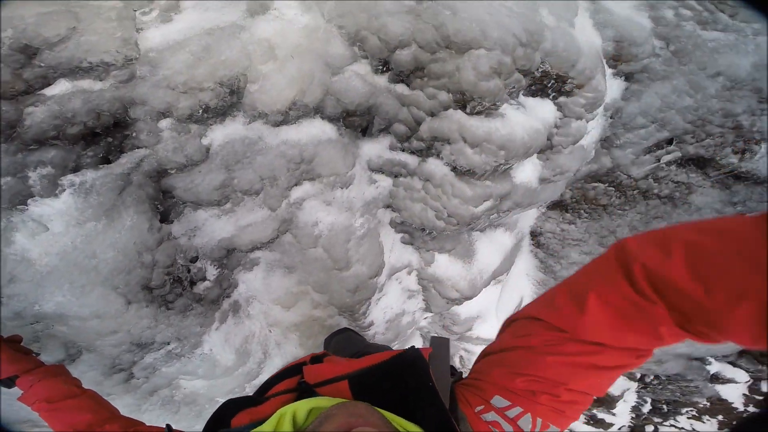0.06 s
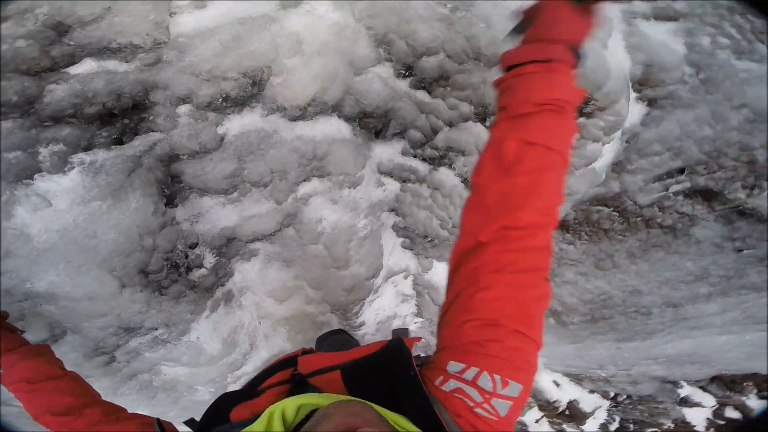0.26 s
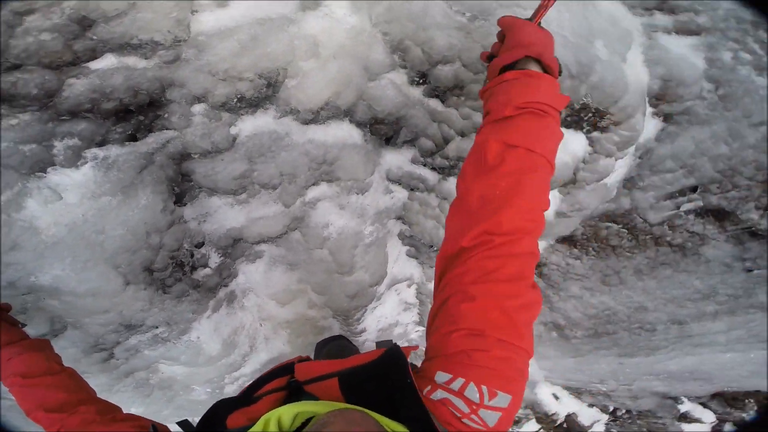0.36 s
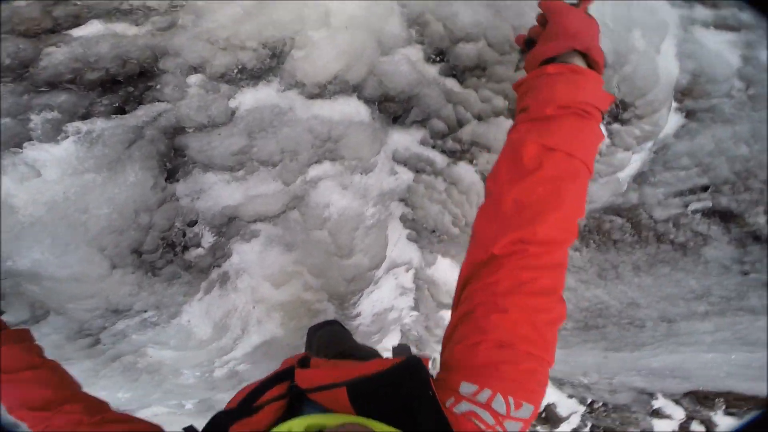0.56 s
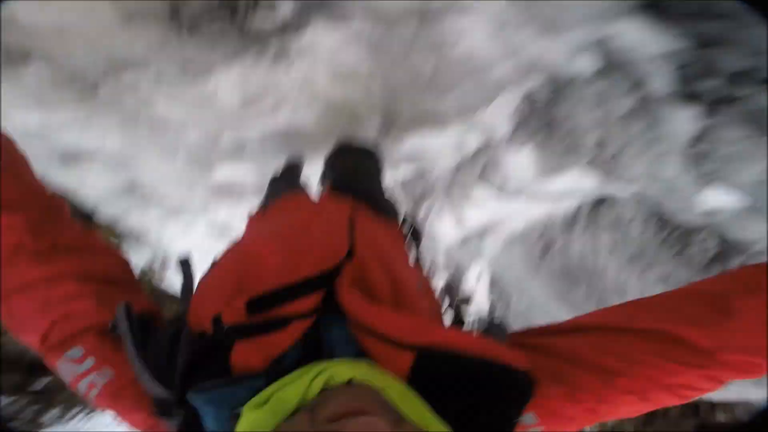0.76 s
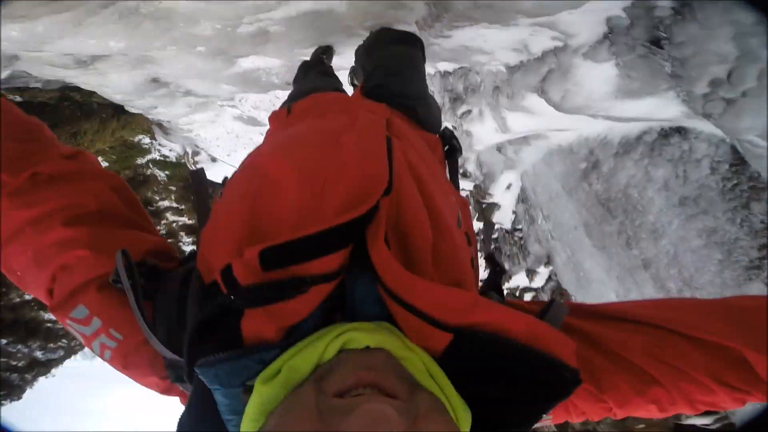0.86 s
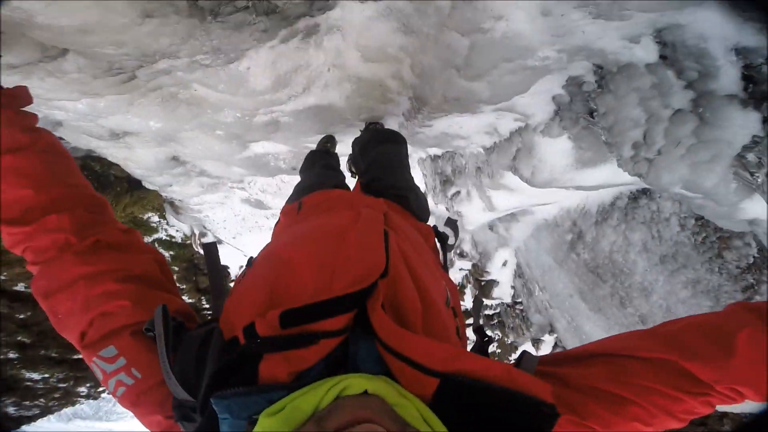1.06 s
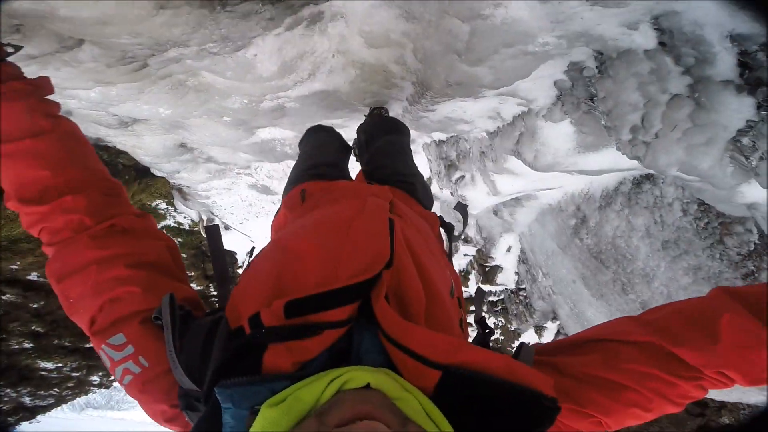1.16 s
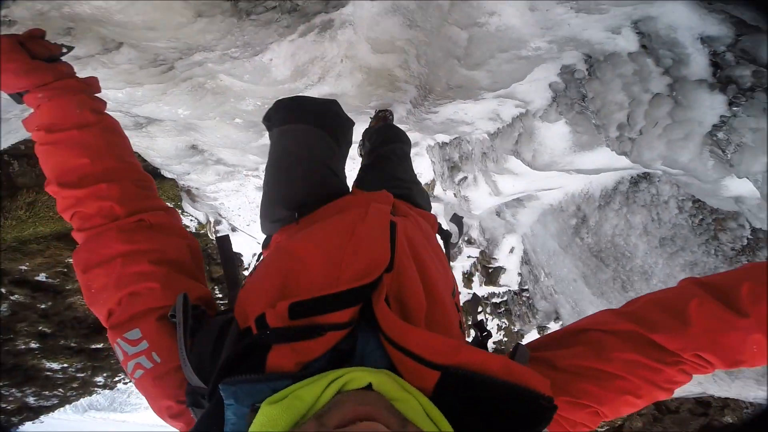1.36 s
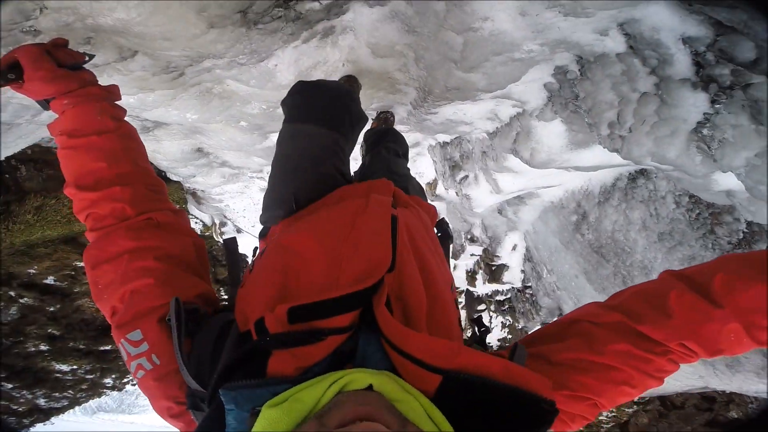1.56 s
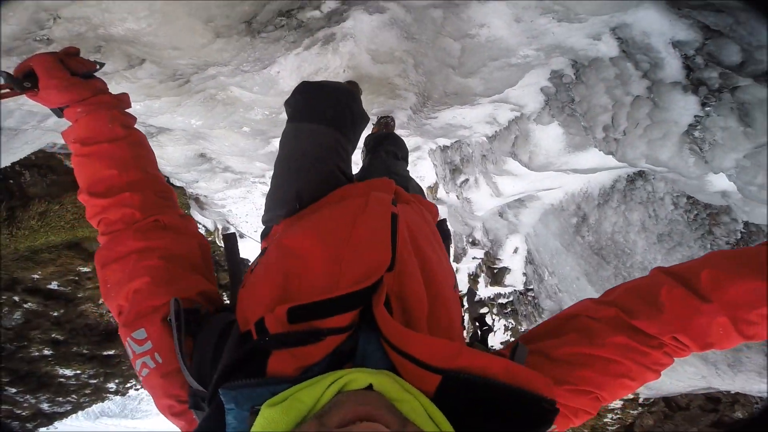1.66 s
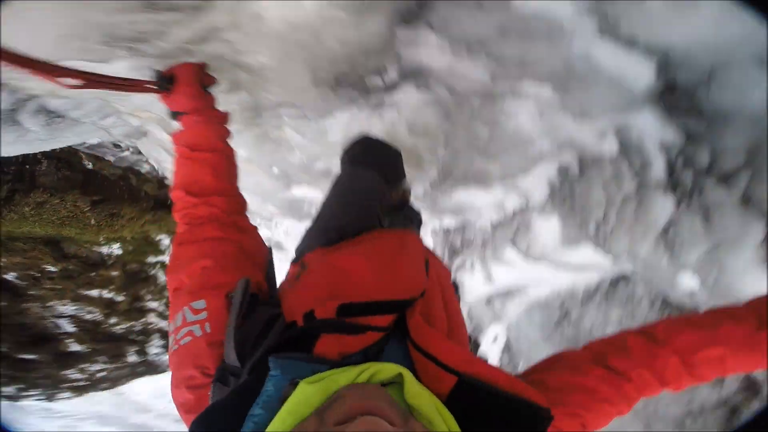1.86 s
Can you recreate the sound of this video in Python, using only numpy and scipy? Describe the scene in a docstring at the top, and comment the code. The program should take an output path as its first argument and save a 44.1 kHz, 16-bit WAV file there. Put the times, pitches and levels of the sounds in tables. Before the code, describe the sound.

Ice climbing up close: steel cracks into ice, hollow knocks and gear clatter, then a duller bite

```python
"""Climbing a frozen cascade

Steel points bite into the ice twice, the second time in two close strokes, with a thud, a crunch and a spray
of chips: damped modes over decaying grainy noise. Around them come hollow knocks, short pulses with an echo and
an after-ring, then a dry clack, clashing gear and scratchy clinks. Movement rumbles on the housing of the
helmet-worn camera, over a faint rush of water and ticking crumbs of ice: coloured noise and tiny damped tones."""
import sys
import numpy as np
from scipy.fft import rfft, irfft, next_fast_len
from scipy.io import wavfile
from scipy.ndimage import map_coordinates

SR = 44100
rng = np.random.default_rng(int(sys.argv[2]) if len(sys.argv) > 2 else 0)


def master(y):
    """Save y as 16-bit WAV."""
    cut = np.clip(np.atleast_2d(y).T, -1, 1)
    pcm = np.round(cut * 32767)  # scale
    wavfile.write(sys.argv[1], SR, pcm.astype(np.int16))


N = 83790  # length [samples]
T = np.arange(SR // 3) / SR  # time axis of one event [s]
WANDER_RAD, WANDER_PER_S = 0.54, 250  # random phase wander of modes: depth [rad], knots per second

# spectrum of a dry contact on hard ice: (frequency [Hz], relative level [dB])
CLACK_SPECTRUM = [(60, -28.5), (250, -6.5), (420, 3.5), (680, 9), (850, -11.5), (1700, 1), (2200, -17),
                  (2800, -4.5), (5500, -35.5), (9000, -38.5), (16000, -73.5)]


def amp(db):
    """The decibel law: level to amplitude gain."""
    return 10 ** (np.asarray(db) / 20)


def unit(x):
    """Power normalisation: scale to rms 1."""
    return x / np.sqrt(np.mean(x ** 2) + 1e-20)


def colour(points, hz):
    """Spectral envelope: gain interpolated in dB between (Hz, dB) points on a log-frequency axis."""
    point_hz, point_db = np.transpose(points)
    return amp(np.interp(np.log(hz + 1), np.log(point_hz + 1), point_db))


def curves(rows):
    """Linear interpolation: one value per sample for each column after the time."""
    times, *columns = np.transpose(rows)
    return [np.interp(np.arange(N) / SR, times, column) for column in columns]


def wobble(rate, size):
    """Band-limited random modulation: a smooth curve through `rate` random knots a second."""
    knots = rng.standard_normal(int(size * rate / SR) + 4)
    return map_coordinates(knots, [np.arange(size) * rate / SR])


def filtered(x, response):
    """Linear filtering: the spectrum is multiplied by a response of frequency."""
    padded = next_fast_len(len(x) + 8192)
    hz = np.fft.rfftfreq(padded, 1 / SR)
    return irfft(rfft(x, padded) * response(hz), padded)[:len(x)]


def noise(points, size):
    """Filtered random noise: white noise shaped by a spectral envelope, at rms 1."""
    return unit(filtered(rng.standard_normal(size), lambda hz: colour(points, hz)))


def fade(t60, rise=0.00018):
    """Exponential damping: a quick rise [s], then a decay of 60 dB in t60 [s]."""
    decay = np.exp(-np.log(1000) * T / t60)
    return decay * (1 - np.exp(-T / rise))


def wander():
    """Phase modulation: the random wander of one partial [rad]."""
    return WANDER_RAD * wobble(WANDER_PER_S, len(T))


def ring(modes, rise=.00013, scatter_db=1):
    """Modal superposition: damped modes (Hz, dB, t60 s) whose levels scatter at each blow."""
    total = 0
    for hz, db, t60 in modes:
        # a random phase wander, growing from zero, roughens each mode
        phase = wander() * np.minimum(T * WANDER_PER_S, 1)
        gain = amp(db + scatter_db * rng.normal())
        total = total + gain * fade(t60, rise) * np.sin(2 * np.pi * hz * T + phase)
    return total


def chord(modes):
    """Additive synthesis: sustained, slightly rough partials (Hz, dB) of metal."""
    total = 0
    for hz, db in modes:
        phase = 2 * np.pi * rng.random() + wander()
        total = total + amp(db) * np.sin(2 * np.pi * hz * T + phase)
    return total


def pulse(points, pitch=1):
    """Minimum phase: one causal push of peak 1 whose spectrum is scaled in frequency by `pitch`."""
    size = len(T)
    hz = np.fft.rfftfreq(size, 1 / SR) / pitch
    cepstrum = irfft(np.log(colour(points, hz)), size)
    cepstrum[1:size // 2] *= 2  # folding the cepstrum forward makes the push causal
    cepstrum[size // 2 + 1:] = 0
    push = irfft(np.exp(rfft(cepstrum)), size)
    return push / np.abs(push).max()


def add(track, s, sound):
    """Linear superposition: mix a sound in at s seconds."""
    part = track[max(0, round(s * SR)):][:len(sound)]
    part += sound[:len(part)]


def rush():
    """Broadband flow noise: faint running water as a murmuring body and a fine hiss."""
    # level of the water: (time [s], body level [dB], hiss level [dB])
    water_levels = [(0, -53, -61.5), (.38, -58, -61.5), (.62, -60, -66), (.72, -39.5, -60),
                    (.77, -44.5, -71), (.86, -48.5, -72), (.95, -66.5, -79.5), (1.15, -69, -75.5),
                    (1.5, -58.5, -65), (1.8, -63.5, -70), (1.9, -53, -64)]
    # spectrum of the body: (frequency [Hz], relative level [dB])
    body_spectrum = [(100, -8.5), (350, 0), (680, 5.5), (950, -5), (1300, -15), (2500, -20.5),
                     (6000, -65.5)]
    # spectrum of the hiss: (frequency [Hz], relative level [dB])
    hiss_spectrum = [(500, -15.5), (1500, 2.5), (3000, 4.5), (6000, -2), (9500, 0), (13000, -8),
                     (15500, -13.5)]
    body_db, hiss_db = curves(water_levels)
    murmur_db = 1.8 * wobble(25, N)
    flicker_db = 1.4 * wobble(330, N)
    body = amp(body_db + murmur_db) * noise(body_spectrum, N)
    hiss = amp(hiss_db + flicker_db) * noise(hiss_spectrum, N)
    return body + hiss


def rumble():
    """Low-frequency pressure noise: air and body movement push on the housing."""
    # level of the rumble: (time [s], level [dB])
    movement_levels = [(0, -55), (.18, -58.5), (.23, -34), (.3, -31.5), (.37, -31.5), (.41, -29),
                       (.54, -40.5), (.59, -32.5), (.65, -45), (.71, -36.5), (.86, -42), (.97, -61),
                       (1.05, -48.5), (1.2, -49), (1.48, -44), (1.525, -40), (1.58, -46.5), (1.67, -44),
                       (1.75, -55.5), (1.9, -47)]
    # spectrum of the rumble: (frequency [Hz], relative level [dB])
    rumble_spectrum = [(20, -1.5), (90, 0.5), (150, -4.5), (250, -12), (2000, -56)]
    level_db, = curves(movement_levels)
    unsteady = noise(rumble_spectrum, N) * amp(2 * wobble(35, N))
    return amp(level_db) * unit(unsteady)


def chips():
    """Random impacts: crumbs of ice tick down the face, each a tiny damped tone."""
    out = np.zeros(N)
    per_s, faintest_db, size_range_db = 43, -66.5, 10
    middle_hz, t60_s = 1500, .01  # pitches lie within an octave of the middle
    for when, pitch, size in rng.random((int(per_s * N / SR), 3)):
        hz = middle_hz * 2 ** (2 * pitch - 1)
        add(out, when * N / SR, amp(faintest_db + size_range_db * size) * ring([(hz, 0, t60_s)]))
    return out


def clinks():
    """Frictional contact noise: short scratches of steel and ice with a two-stage decay."""
    # clinks: (time [s], level [dB], spectral tilt [dB per octave])
    clink_events = [(.651, -42, -6.5), (.685, -39.5, 5.5), (.689, -35.5, -6), (0.699, -44, 1),
                    (0.7909, -30, -8), (0.7984, -32, -8), (0.8292, -30, -5), (0.8534, -51, 1.5),
                    (.9655, -55, 18), (1.671, -44, -2)]
    # spectrum before the tilt: (frequency [Hz], relative level [dB])
    clink_spectrum = [(300, -4.5), (2000, 6), (3500, 4.5), (5500, 0), (7300, -8), (9700, -6.5),
                      (15000, -25.5)]
    t60_s, tail_db, tail_t60_s = 0.015, -17.5, 0.035
    out = np.zeros(N)
    for s, db, tilt_db in clink_events:
        tilted = [(hz, level + tilt_db * np.log2(hz)) for hz, level in clink_spectrum]
        decay = fade(t60_s, 0.00019) + amp(tail_db) * fade(tail_t60_s)
        add(out, s, amp(db) * noise(tilted, len(T)) * decay)
    return out


def rattles():
    """Two-stage damping: metal gear clashes briefly, with a faint tonal tail."""
    # clashes: (time [s], level [dB])
    clashes = [(0.7332, -33), (0.7496, -32.5)]
    # partials of the gear: (frequency [Hz], relative level [dB])
    gear_modes = [(2200, 0), (3596, -2.5), (3946, -1.5), (4900, -2.5), (5300, -5), (5600, -4.5),
                  (6498, -10), (8250, -12)]
    clash_t60_s, tail_db, tail_t60_s = 0.0095, -19, 0.094
    out = np.zeros(N)
    for s, db in clashes:
        decay = fade(clash_t60_s) + amp(tail_db) * fade(tail_t60_s)
        add(out, s, amp(db) * chord(gear_modes) * decay)
    return out


def clacks():
    """Impulse excitation: a dry contact on hard ice as a single push."""
    # clacks: (time [s], peak level [dB])
    clack_events = [(0.7278, -8.5)]
    out = np.zeros(N)
    for s, db in clack_events:
        add(out, s, amp(db) * pulse(CLACK_SPECTRUM))
    return out


def knocks():
    """Impact and reflection: a blunt contact, its echo, a hollow after-ring, a ping and a little grit."""
    # knocks: (time [s], contact peak [dB], pitch factor of the contact [ratio],
    #          after-ring [dB re contact], extra hollow mode [Hz], ping [dB re contact])
    knock_events = [(.078, -36.5, 0.78, -31, 590, -19), (.459, -25, 1.07, -3.5, 689, -24),
                    (0.4977, -8.5, 1.013, -10.5, 607, -23), (0.5874, -37, .8, -5, 554, -32),
                    (0.7909, -29.5, 1.54, 3.5, 603, -16), (0.8231, -6.5, 1.06, -6, 566, -4),
                    (0.8834, -8, 0.99, -8.5, 516, -31.5), (1.115, -47, 0.825, -2, 600, -30),
                    (1.423, -46, 0.99, -5, 940, -20.5), (1.823, -36, 0.86, -5, 647, -19),
                    (1.89, -37.5, 0.87, 0, 600, -12)]
    # contact spectrum before the pitch factor: (frequency [Hz], relative level [dB])
    contact_spectrum = [(80, -32), (300, -21), (460, -0.5), (680, 5), (1020, 2.5), (1300, -20.5),
                        (2200, -16), (2750, -36.5), (3500, -19.5), (4600, -44.5), (5700, -25),
                        (7000, -73.5), (12000, -49.5), (16000, -71)]
    # fixed modes of the after-ring: (frequency [Hz], relative level [dB], t60 [s])
    hollow_modes = [(712.5, 0, 0.036), (885, -1.5, .045), (1070, -11, 0.022), (1820, -20.5, 0.038)]
    hollow_t60_s, hollow_rise_s = 0.044, 0.0053
    ping_hz, ping_t60_s = 1393, 0.016
    grit_db, grit_t60_s = -21.5, 0.04  # frost crumbling under the knock
    echo_s, echo_db, echo_hz = .00555, -9.5, 1700  # the ice face, a metre away, returns a dull copy
    out = np.zeros(N)
    for s, db, pitch, ring_db, extra_hz, ping_db in knock_events:
        contact = pulse(contact_spectrum, pitch)
        echo = filtered(contact, lambda hz: 1 / (1 + 1j * hz / echo_hz) ** 2)
        # the extra mode enters in opposite phase
        hollow = ring(hollow_modes, hollow_rise_s) - ring([(extra_hz, 0, hollow_t60_s)], hollow_rise_s)
        ping = ring([(ping_hz, ping_db, ping_t60_s)])
        grit = amp(grit_db) * noise(CLACK_SPECTRUM, len(T)) * fade(grit_t60_s, .0008)
        add(out, s, amp(db) * (contact + grit + amp(ring_db) * hollow + ping))
        add(out, s + echo_s, amp(db + echo_db) * echo)
    return out


def thuds():
    """Momentum transfer: the ice stops the blow, giving one shove and two short low modes."""
    # thuds: (time [s], level [dB], low mode [Hz], high mode [Hz], high mode [dB re low mode])
    thud_events = [(0.3988, -12, 447, 917, -5.5), (0.4032, -18.5, 309, 938, -12),
                   (0.4088, -23, 110, 169, -6), (.576, -33.5, 248, 337, 1.5), (1.5945, -27, 531, 794, 3),
                   (1.6064, -13.5, 527.5, 802, -3.5), (1.628, -31.5, 480, 720, -3),
                   (1.67, -32, 450, 687, -9)]
    # spectrum of the dull shove: (frequency [Hz], relative level [dB])
    shove_spectrum = [(40, -9.5), (130, -8), (300, -5), (600, -3.5), (1200, -23), (4000, -40.5)]
    t60_s, attack_s, shove_db = 0.043, 0.00077, -4
    out = np.zeros(N)
    for s, db, low_hz, high_hz, high_db in thud_events:
        modes = [(low_hz, 0, t60_s), (high_hz, high_db, t60_s)]
        shove = amp(shove_db) * pulse(shove_spectrum)
        add(out, s, amp(db) * (ring(modes, attack_s) + shove))
    return out


def grainy(points, grain_db):
    """Amplitude modulation: coloured noise made granular by rapid level changes, at rms 1."""
    return unit(noise(points, len(T)) * amp(grain_db * wobble(900, len(T))))


def bites():
    """Fracture and modal ringing: steel cracks and rings, ice crushes in grains, chips spray away."""
    # bites: (time [s], steel ring [dB], crunch [dB], crunch t60 [s], spray of chips [dB],
    #         crack [Hz], crack [dB], after-ring [dB])
    bite_events = [(0.3949, -16.5, -16.5, 0.048, -28.5, 3077, -6.5, -41.5),
                   (1.5941, -39, -28, 0.098, -60, 3010, -27.5, -70),
                   (1.6047, -23, -20, 0.042, -32, 1970, -17.5, -67)]
    # modes of the struck steel: (frequency [Hz], relative level [dB], t60 [s])
    steel_modes = [(1958, -7, 0.051), (2950, -4, 0.047), (3220, -4.5, 0.04), (4950, 3.5, 0.015),
                   (7670, -11.5, 0.018), (8250, -10.5, 0.022), (11920, -9, 0.011)]
    # partials of the steel singing on after the blow: (frequency [Hz], relative level [dB])
    singing_modes = [(3230, 0.5), (4581, -1.5), (4960, -5), (12030, -4)]
    # spectrum of the crushed ice: (frequency [Hz], relative level [dB])
    crunch_spectrum = [(100, -6.5), (500, 8), (1200, -5.5), (2000, -2), (3200, -11), (4900, -4),
                       (5900, -17), (8200, -11.5), (12500, -25.5), (15500, -39.5)]
    # spectrum of the flying chips: (frequency [Hz], relative level [dB])
    spray_spectrum = [(100, 3), (450, 20), (1200, 2), (3000, -1), (5000, -1.5), (6200, -10), (15000, -22.5)]
    crack_t60_s, singing_t60_s = 0.015, 0.18
    spray_t60_s, spray_rise_s = 0.23, 0.0048
    crunch_grain_db, spray_grain_db = 1.5, 2.5
    out = np.zeros(N)
    for s, steel_db, crunch_db, crunch_t60_s, spray_db, crack_hz, crack_db, singing_db in bite_events:
        steel = amp(steel_db) * ring(steel_modes, rise=0.00093)
        singing = amp(singing_db) * chord(singing_modes) * fade(singing_t60_s)
        crack_tone = np.sin(2 * np.pi * crack_hz * T + 0.57 * wobble(560, len(T)))
        crack = amp(crack_db) * fade(crack_t60_s, 0.00073) * crack_tone
        crunch = amp(crunch_db) * grainy(crunch_spectrum, crunch_grain_db) * fade(crunch_t60_s, 0.00066)
        spray = amp(spray_db) * grainy(spray_spectrum, spray_grain_db) * fade(spray_t60_s, spray_rise_s)
        add(out, s, steel + singing + crack + crunch + spray)
    return out


def scene():
    """Superposition: all sources sum at the one microphone."""
    background = rush() + rumble() + chips()
    contacts = clinks() + rattles() + clacks() + knocks()
    return (background + contacts + thuds() + bites())[None]


def record(dry):
    """Band limitation: a steep low-pass removes what lies above the camera's upper limit."""
    top_hz = 15300
    return np.array([filtered(x, lambda hz: 1 / np.sqrt(1 + (hz / top_hz) ** 200)) for x in dry])


dry = scene()
out = record(dry)
master(out)
```